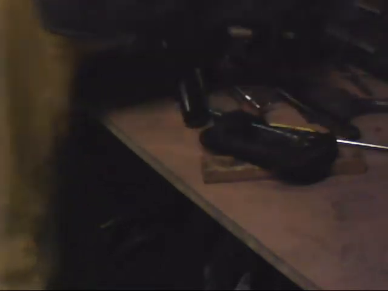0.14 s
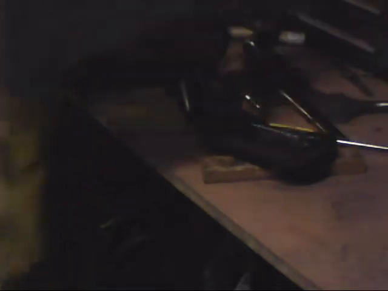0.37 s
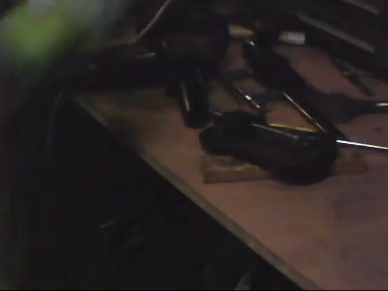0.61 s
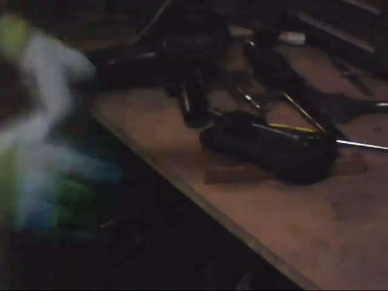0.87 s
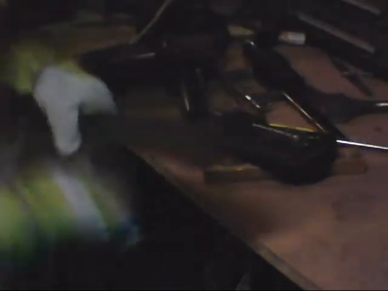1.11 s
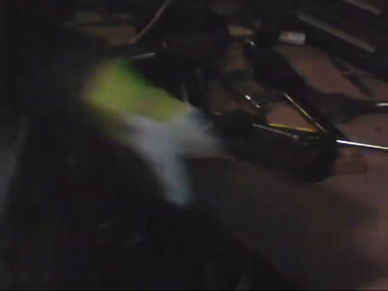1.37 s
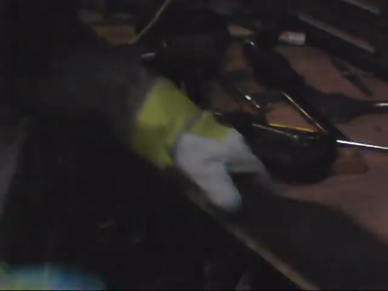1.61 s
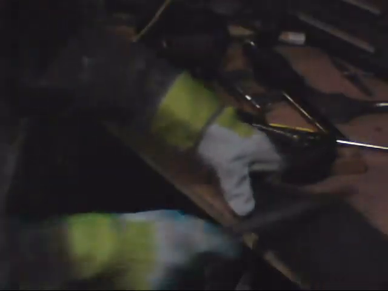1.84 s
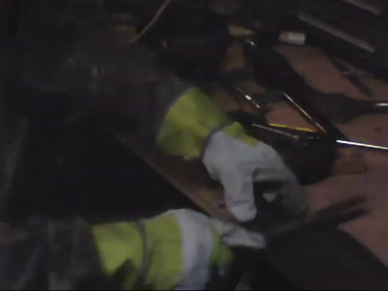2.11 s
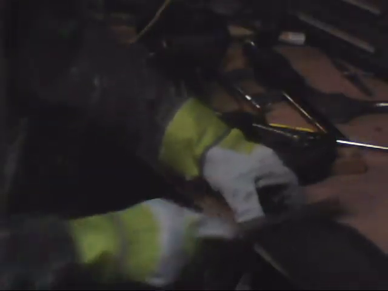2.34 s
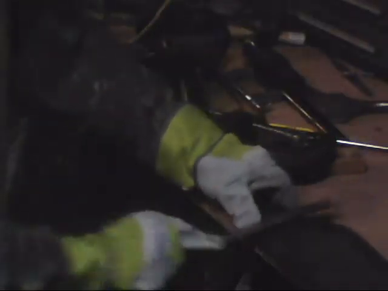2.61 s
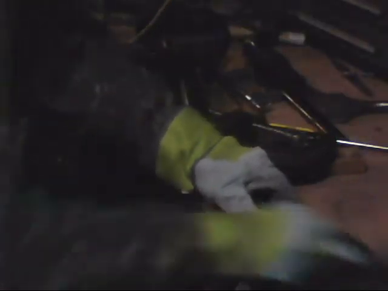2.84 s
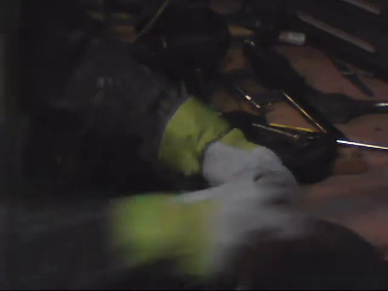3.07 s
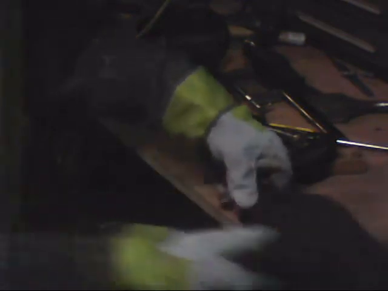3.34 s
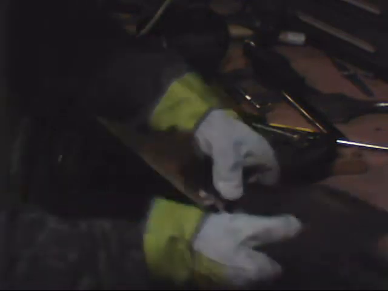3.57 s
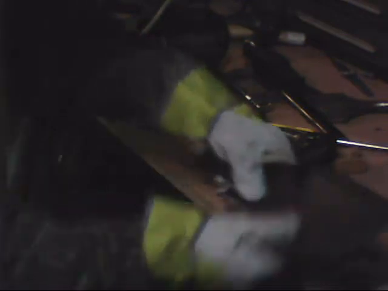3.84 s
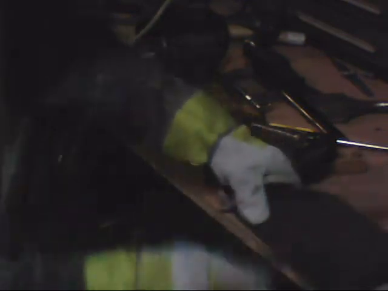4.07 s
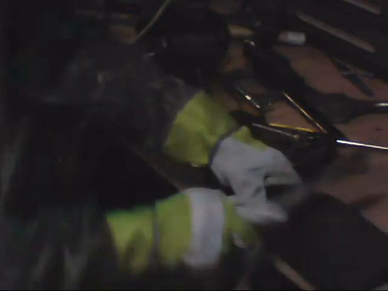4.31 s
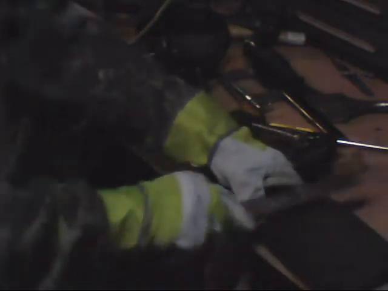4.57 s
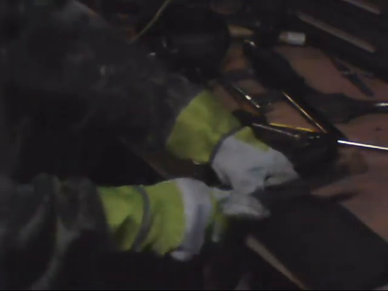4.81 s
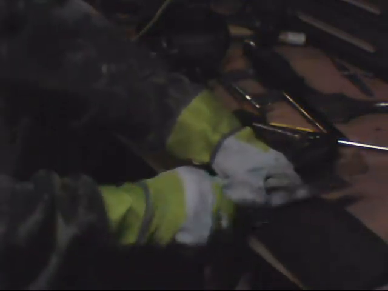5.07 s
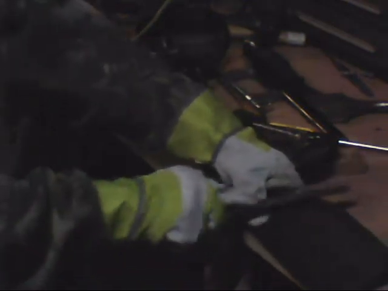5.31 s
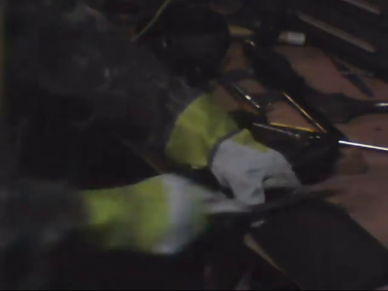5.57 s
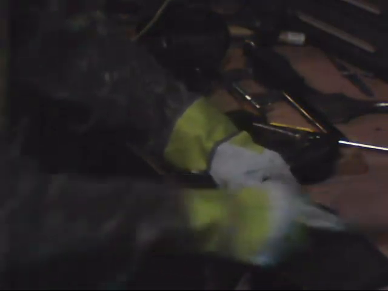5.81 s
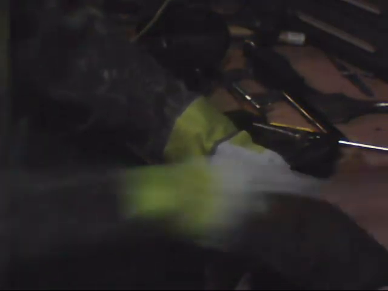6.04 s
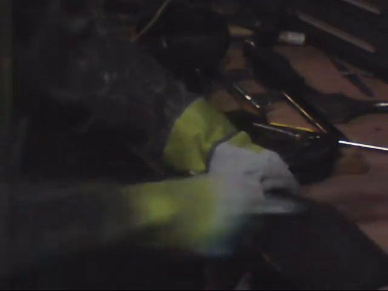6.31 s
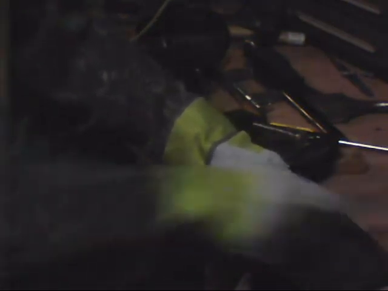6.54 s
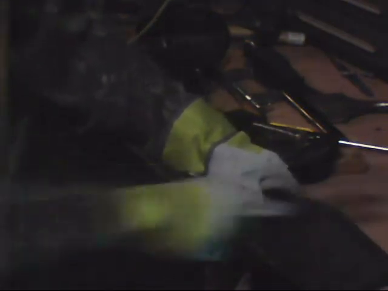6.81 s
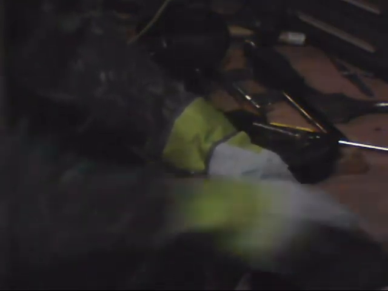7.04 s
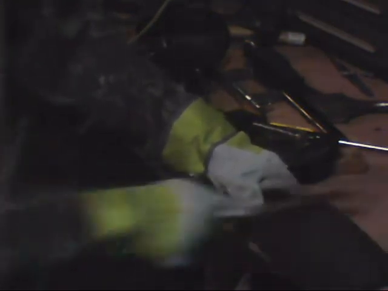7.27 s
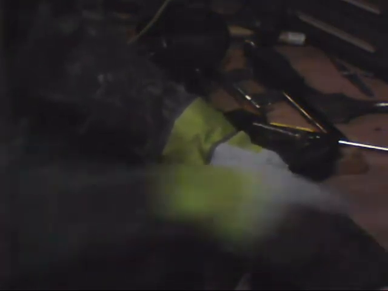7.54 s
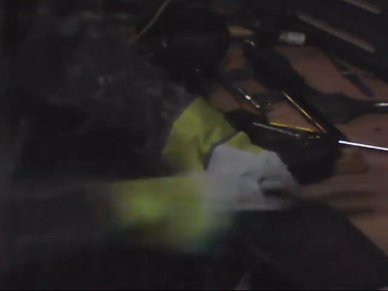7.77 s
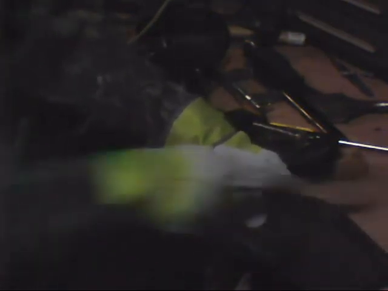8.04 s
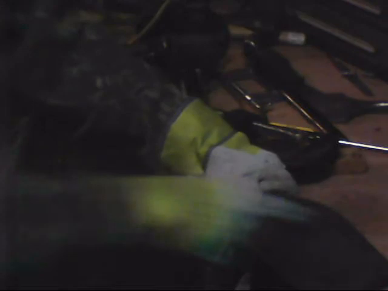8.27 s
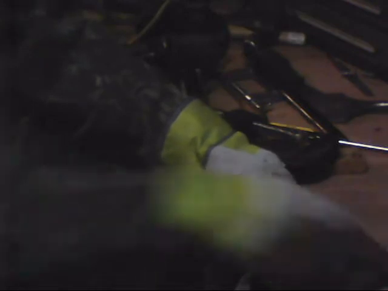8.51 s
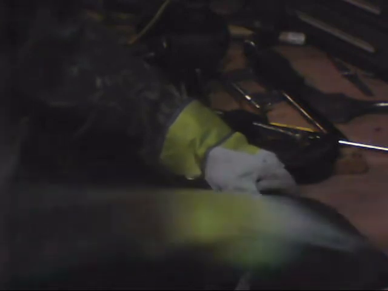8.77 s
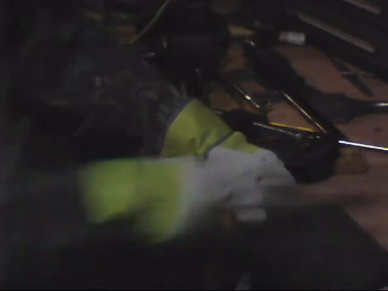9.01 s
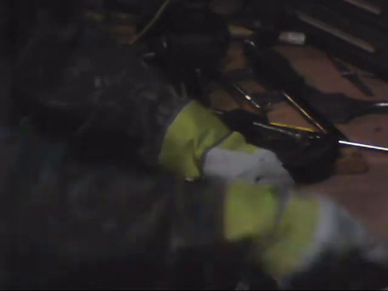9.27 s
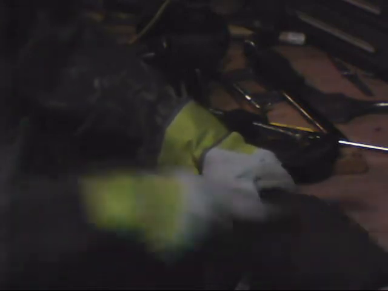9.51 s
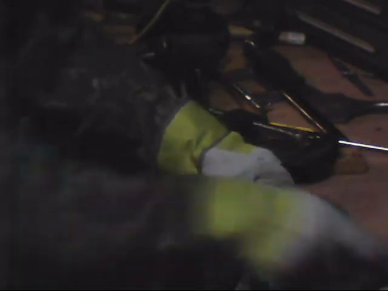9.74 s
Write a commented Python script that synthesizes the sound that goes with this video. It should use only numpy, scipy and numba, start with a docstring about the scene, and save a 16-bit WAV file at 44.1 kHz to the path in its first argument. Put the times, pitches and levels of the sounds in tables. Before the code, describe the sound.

In a small, dry workshop, about a metre from a hissy little camera microphone, loose tools clatter with bright clinks and a scrape during the first 0.4 s, including a tiny click. A small knock at 0.7 s leads into faint creaks and shuffling, then a knock at 1.6. A short file rasp comes at 1.8, light scuffs from 2.3, and a rising stroke at 2.6 to 2.9. Knocks follow at 3.0 and 3.6, then a hard, loud clack at 4.0 with a brief squeak, a knock at 4.4 and a short rasp at 4.6. Clicks at 5.1 precede a longer scrape at 5.5 to 5.9. From 6.2 to the end, gritty strokes repeat about every half second, each landing with a sharp steel knock, ringing near a nasal midrange pitch with bright edge fizz, many closing on a dull wooden tap. Hiss swells mildly around 6 to 7.

```python
"""A file rasps over a thin steel blade: many strokes land with a knock, and some end in a duller tap.
Loose tools clink while the blade is fetched. The gloved hand works at a wooden bench, a metre from a
small camera. Random catches of the teeth and chattering knocks ring resonances of blade, edge and bench.
A small workshop echoes it through delay lines; the camera microphone adds shaped noise as hiss,
very low sway, faint sine tones and a drifting offset that drops with a click."""
import sys
import numpy as np
from scipy import signal
from scipy.fft import rfft, irfft
from scipy.io import wavfile
from scipy.ndimage import uniform_filter1d
from numba import njit

SR = 44100
rng = np.random.default_rng(int(sys.argv[2]) if len(sys.argv) > 2 else 0)


def volts_from_db(level):
    """Convert decibel levels to linear amplitude ratios."""
    exponent = np.asarray(level, float) / 20
    return 10 ** exponent


def master(y):
    """Save y as 16-bit WAV."""
    cut = np.clip(np.atleast_2d(y).T, -1, 1)
    pcm = np.round(cut * 32767)  # scale
    wavfile.write(sys.argv[1], SR, pcm.astype(np.int16))


N = 435708

# File strokes, with an opening clatter and an early scrape shaped alike: (start [s],
# time to top speed [s], time from there to the end of the push [s], blade force [dB],
# edge re blade [dB], bench re blade [dB], favoured pitch at the end of the push [Hz])
STROKES = [(.2, 0.047, 0.11, -33.5, 0, -0.5, 2140), (1.814, 0.014, 0.14, -32, -5.5, -9.5, 2080),
           (2.605, .29, 0.038, -31.5, 0, -4.5, 2000), (4.583, 0.058, 0.054, -28.5, -8, -5.5, 1960),
           (5.545, .09, .3, -33, -11, 2, 1952), (6.236, 0.15, 0.14, -31, -5.5, -1, 2040),
           (6.761, 0.22, 0.039, -28, -0.5, -1, 2140), (7.259, 0.16, 0.058, -29, 0.5, -1, 2110),
           (7.72, 0.13, 0.049, -29.5, -8, -1.5, 1920), (8.19, 0.18, 0.068, -28, -2.5, -4, 1790),
           (8.688, 0.11, 0.08, -25.5, 0, -7.5, 1860), (9.112, 0.15, .025, -28, 2.5, -8, 1840),
           (9.538, 0.077, 0.1, -28, 0, -5.5, 1770)]
# The blade sings out briefly within a stroke: (peak time [s], level [dB])
SURGES = [(2.77, -41), (5.668, -32), (6.35, -30), (6.868, -21), (6.89, -23.5), (7.294, -23.5), (7.35, -22),
          (8.21, -37), (8.309, -28), (8.822, -29), (9.27, -29)]
# Scuffs and slides, each one swell: (peak time [s], rise [s], fall [s], blade force [dB],
# edge re blade [dB], bench re blade [dB])
SCUFFS = [(.18, .02, 0.041, -38.5, -2.5, 0), (.62, .04, .05, -65, -8, -5),
          (.672, 0.0086, 0.047, -45, -1, -8), (1.17, 0.086, 0.14, -58.5, -20, -9),
          (1.314, .015, 0.017, -49, -17, -22), (1.27, .02, 0.026, -65, -10, -1),
          (2.14, 0.065, 0.037, -61, -16, 0), (3.55, .02, .02, -63, -5, 11),
          (2.33, 0.074, 0.1, -35, -8, -5.5), (2.41, 0.089, 0.091, -49, -16, 11),
          (2.52, 0.047, .06, -59.5, -12, 0), (2.975, 0.0085, 0.023, -42.5, 0, 2),
          (3.17, 0.034, 0.11, -60, -9, 2.5), (3.79, 0.076, .05, -56.5, -6, -4),
          (3.931, 0.061, 0.031, -33, 0, -6), (4.09, 0.033, 0.043, -46, -12, 1.5),
          (4.15, .02, 0.025, -55, -11, -7), (4.543, 0.041, 0.029, -47, -7, 5.5),
          (4.757, 0.023, 0.036, -37, -17, -5.5), (4.824, 0.031, 0.033, -30, -13, -8),
          (4.95, 0.066, 0.11, -53.5, -11, -3), (5.159, .03, 0.08, -38.5, -15.5, -2.5),
          (5.39, 0.052, 0.096, -42, -9, 1), (5.475, 0.11, 0.048, -38.5, -10.5, 1),
          (5.9, 0.081, 0.058, -26.5, 2.5, -22), (6.549, 0.014, 0.02, -50.5, -24, 14),
          (7.94, .02, 0.028, -50.5, -16, 19.5), (8.45, 0.039, 0.021, -36, -3, 0),
          (8.63, 0.017, .03, -60.5, -9, 14)]
# The file lands: (time [s], level [dB], delay of the thud into the bench [s], thud level [dB])
LANDINGS = [(6.202, -9.5, .003, -14.5), (6.7293, -11.5, 0.0064, -16.5), (7.2265, -14, 0.0062, -15),
            (7.6975, -5.5, 0.0057, -21), (8.1575, -12.5, .015, -21.5), (8.6591, -13, 0.0059, -10),
            (9.0772, -13.5, 0.013, -9), (9.502, -16.5, 0.019, -13.5)]
# Dull taps as the file lifts or is set down: (time [s], level [dB])
TAPS = [(7.558, -18.5), (8.0075, -36.5), (8.512, -23), (8.9548, -13.5), (9.377, -15.5), (9.8168, -28.5)]
# Other knocks and clinks: (time [s], blade level [dB], edge re blade [dB], bench re blade [dB],
# nominal chatter [s]); knocks() scales these for each part
KNOCKS = [(0.1065, -36.5, -4.5, -2, 0.21), (0.167, -27, -7.5, -7, 0.046), (0.2296, -19.5, -20, -4.5, 0.1),
          (0.2915, -21, -8.5, -9, 0.039), (0.3097, -22, -11, -7, 0.045), (0.668, -30.5, 2, -22, 0.036),
          (1.5668, -18, -19, -12, 0.12), (1.8175, -25, -5, -8, 0.13), (2.1889, -46.5, -5, -0.5, 0.069),
          (3.026, -19.5, -26, -3, 0.091), (4.0304, -7.5, -32, -7.5, 0.039),
          (3.5865, -20.5, -3.5, -10, 0.074), (3.89, -34, 0, -14, 0.05), (4.3804, -18, -10.5, -10, 0.093),
          (4.599, -37, -12, -6, 0.099), (5.0666, -25, -16, -24, 0.08), (5.077, -20.5, -16.5, -10.5, 0.087),
          (7.8863, -14.5, -8.5, -4.5, 0.056), (9.248, -22, -6.5, -20, 0.04)]
# Resonances of the blade: (centre [Hz], width [Hz], relative level [dB])
BLADE_MODES = [(1453, 83, -12), (1630, 29, -6.5), (1713, 78, -11), (1892, 96, 1), (1941, 124, -2.5),
               (2044, 101, 0), (2167, 68, -8), (2228, 88, -3), (2427, 36, -20.5), (2636, 210, -17),
               (2000, 840, -9)]
# Resonances of the blade's edge: (centre [Hz], width [Hz], relative level [dB])
EDGE_MODES = [(2920, 14, 5.5), (3190, 150, -4.5), (3547, 97, 2.5), (3886, 58, -2), (4400, 65, -0.5),
              (4864, 31, -5), (5076, 94, 2.5), (5410, 123, 3.5), (5780, 79, -0.5), (6000, 76, -5.5),
              (6500, 420, -13.5), (6810, 105, -4), (8240, 74, -1.5), (8720, 59, -0.5), (10720, 230, -10),
              (11620, 150, -2.5), (13600, 140, -4), (3980, 2500, -6.5), (10640, 26500, -12.5)]
# Resonances of the wooden bench: (centre [Hz], width [Hz], relative level [dB])
BENCH_MODES = [(109, 44, -14), (234, 28, -10.5), (465.5, 58, -10), (547, 38.3, -0.5), (698, 31.3, -2.5),
               (811, 60, 1), (994.3, 23.8, 1.5), (1123, 72, -2), (1168, 58, -2), (1296, 38, -0.5),
               (844, 1210, -10)]
# Resonances of the loose tools: (centre [Hz], width before narrowing [Hz], relative level [dB])
TOOL_MODES = [(4030, 64, 3), (4750, 49, 12), (5160, 13, 15.5), (6290, 63, 4), (7040, 31, -22),
              (7730, 46, -6), (8880, 47, -9), (8650, 73, 4), (9740, 27, -25), (10740, 43, -25),
              (11500, 84, -32), (13300, 60, -6), (12500, 44, -12), (14700, 63, -14)]
# How freely the loose tools ring along: (from [s], to [s], level re edge force [dB])
JOSTLES = [(0.11, 0.417, 0), (0.664, .7, -26), (1.81, 1.992, -8.5)]
# Short creaks and squeaks, and a low rumble at the start: (start [s], length [s], centre [Hz],
# width [Hz], level before fades [dB])
CREAKS = [(.22, .16, 280, 160, -45), (0.11, .05, 4900, 19, -50), (0.64, .06, 406, 43, -54),
          (0.682, .14, 555, 13, -69), (0.702, .5, 204, 30, -70), (0.82, .19, 410, 30, -59),
          (.735, .07, 2150, 30, -64), (0.747, .09, 2300, 60, -67), (.89, .14, 2000, 19, -64),
          (1.05, .065, 1970, 18, -67), (1.018, 0.15, 410, 60, -62.5), (1.258, 0.033, 460, 50, -63),
          (3.88, .145, 554.5, 5.2, -41.5), (3.935, .1, 760, 16, -53), (3.922, 0.042, 5700, 47, -34.5),
          (5.099, 0.25, 460, 26, -54), (6.306, 0.017, 5300, 60, -40)]
# Spectrum of the microphone hiss: (frequency [Hz], relative density [dB per Hz])
HISS_SPECTRUM = [(21, -31), (35, 4), (123, -4.5), (205, -10), (294, -12), (1510, -20.5), (3530, -23),
                 (4010, -23), (6360, -24), (7420, -24.5), (8430, -24), (14800, -29), (16000, -25.5)]
# Common swell of hiss, sway and standing offset: (time [s], level [dB])
MIC_SWELL = [(.05, 5.5), (.15, 2), (1, -1), (2, 2.5), (3, 4), (4, 6), (5, 8), (6, 9.5), (7, 9.5), (8, 8),
             (9, 6), (9.88, 5.5)]
# Faint steady tones: (frequency [Hz], mean level [dB])
WHINE = [(7246, -81), (10099, -88), (11951, -89), (14804, -86)]
REST_HZ = 2000  # favoured pitch between strokes


def add_strokes(t, force, favoured_hz):
    """Force grows with speed on every part and the pitch moves along; after the push the force dies away."""
    start_speed, end_speed = 0.29, 0.62  # shares of top speed
    start_hz, fast_hz = 1827, 2084  # favoured pitch at the start and at top speed
    # for blade, edge and bench
    speed_power = np.array([[0.4], [1.62], [0.52]])
    fade_db_per_s = (700, 522, 305)
    bite_s = 0.012
    for s, push_s, ease_s, db, edge_db, bench_db, end_hz in STROKES:
        end_s = push_s + ease_s
        on = span(s, s + end_s + 0.2)
        u = t[on] - s
        turns = [0, push_s, end_s]
        speed = np.interp(u, turns, [start_speed, 1, end_speed])
        fade_db = np.outer(fade_db_per_s, np.maximum(u - end_s, 0))
        size = volts_from_db(parts_db(db, edge_db, bench_db) - fade_db)
        force[:, on] += size * speed ** speed_power * (1 - np.exp(-u / bite_s))
        favoured_hz[on] = np.interp(u, turns, [start_hz, fast_hz, end_hz])


def add_surges(t, force, favoured_hz):
    """Brief swells of blade force pull the favoured pitch towards one note."""
    rise_s, fall_s, surge_hz = 0.023, 0.052, 1872
    for s, db in SURGES:
        on = span(s - 2 * rise_s, s + 2 * fall_s)
        shape = volts_from_db(swell_db(t[on], s, rise_s, fall_s))
        force[0, on] += volts_from_db(db) * shape
        favoured_hz[on] += shape * (surge_hz - favoured_hz[on])


def add_scuffs(t, force):
    """Each scuff is one lopsided swell of force on blade, edge and bench."""
    for s, rise_s, fall_s, db, edge_db, bench_db in SCUFFS:
        on = span(s - 2 * rise_s, s + 2 * fall_s)
        swell = swell_db(t[on], s, rise_s, fall_s)
        force[:, on] += volts_from_db(parts_db(db, edge_db, bench_db) + swell)


def fidget(t):
    """Gloves shift faintly on blade, edge and bench, with one random swell common to all three."""
    spread_db = 12
    present = (t > 0.63) & (t < 7.3)
    part_db = np.array([[-69.5], [-88], [-82]])
    return present * volts_from_db(part_db + spread_db * walk(12))


def rubbing():
    """Force envelopes of everything that slides on blade, edge and bench, and the pitch the teeth favour."""
    t, favoured_hz = np.arange(N) / SR, np.full(N, float(REST_HZ))
    force = fidget(t)
    add_strokes(t, force, favoured_hz)
    add_scuffs(t, force)
    add_surges(t, force, favoured_hz)
    favoured_hz = uniform_filter1d(favoured_hz, SR // 100) * (1 + 0.051 * walk(14))
    # the file judders: the whole contact tightens and slackens, each part a little on its own
    judder_db = 2.0 * walk(45)
    own_db = np.array([1.0 * walk(160), 2.25 * walk(110), 2.3 * walk(25)])
    return force * volts_from_db(judder_db + own_db), favoured_hz


def file_teeth(favoured_hz):
    """Fine random catches on each part, with coarse ones shared; a band near the pitch drives the blade."""
    teeth = np.array([grit(16000, 2.5) for _ in range(3)])
    teeth += volts_from_db(-7) * grit(1400, 1.5)  # coarse catches shake all three parts at once
    # the teeth pass at a rate that follows the hand and drive the blade modes near it hardest
    teeth[0] += 1.04 * svf(teeth[0], 2020.0, 230.0, favoured_hz / 2000)
    return teeth


def knocks():
    """Each knock: a first hard tick, then chatter, quick on edge and blade, late and long in the bench."""
    # edge re blade dB, bench re blade dB, nominal chatter s
    landing, thud, tap = (-9, -8.5, 0.045), (-13.5, -2, 0.051), (-31, -1, 0.043)
    approach_s = 0.002225  # first touch comes just before the blow peaks
    blows = KNOCKS + [(s, db, *tap) for s, db in TAPS]
    blows += [(s, db, *landing) for s, db, _, _ in LANDINGS]
    blows += [(s + late_s, db, *thud) for s, _, late_s, db in LANDINGS]
    chatter, tick = np.zeros((3, N + SR)), np.zeros((3, N))
    t = np.arange(SR // 4) / SR
    rise_s = np.array([[0.0003], [0.0002], [0.0032]])
    rise = 1 - np.exp(-t / rise_s)
    for s, db, edge_db, bench_db, chatter_s in blows:
        # time to die away by 60 dB on each part
        fall_s = np.clip(chatter_s * np.array([[1], [0.7], [1.3]]), 0.004, 0.4)
        fall = np.exp(-np.log(1000) * t / fall_s)
        size = volts_from_db(parts_db(db, edge_db, bench_db + 3.5))
        at = int((s - approach_s) * SR)
        chatter[:, at:at + len(t)] += size * rise * fall
        tick[:, at] += size[:, 0] * volts_from_db(np.array([17, 8, 12]))
    return chatter[:, :N], tick


def ringing_board():
    """A narrow resonance of a bench board rings on after each tap."""
    tapped = np.zeros(N)
    tapped[[int(s * SR) for s, db in TAPS]] = volts_from_db(np.array(TAPS)[:, 1])
    return volts_from_db(38) * svf(tapped, 546.0, 7.6, np.ones(N))


def loose_tools(edge):
    """Force on the edge jostles the loose tools, which clink at narrow resonances."""
    t = np.arange(N) / SR
    freedom = sum(volts_from_db(db) * ((t > t0) & (t < t1)) for t0, t1, db in JOSTLES)
    narrowed = [(hz, np.clip(width * 0.43, 18, 60), db) for hz, width, db in TOOL_MODES]
    return body(edge * freedom, narrowed, np.ones(N), 8.2)


def creaks():
    """Creaks, squeaks and a low rumble: rough noise bands, narrow or wide, that swell and fade."""
    out = np.zeros(N)
    for s, length_s, hz, width, db in CREAKS:
        n, at = int(length_s * SR), int(s * SR)
        tone = svf(rng.standard_normal(SR), float(hz), float(width), np.ones(SR))
        # even out the random strength, so that each holds fairly steady
        strength = np.abs(signal.hilbert(tone)) + 1e-9
        tone = (tone / strength ** 0.7)[-n - 500:-500]
        out[at:at + n] += level(tone, db) * signal.windows.tukey(n, 0.5)
    return out


def steel():
    """Sliding and knocks shake the same blade, edge and bench; tools, creaks and board join, dry."""
    slide, favoured_hz = rubbing()
    chatter, tick = knocks()
    bounces = np.array([grit(per_s, 0.52) for per_s in (4000, 14000, 3000)])  # blade, edge, bench
    blade, edge, bench = slide * file_teeth(favoured_hz) + chatter * bounces + tick
    # the resonances follow part of the favoured pitch's movement
    bend = favoured_hz / 2000 - 1
    blade_glide = 1 + 0.4 * bend + 0.0031 * walk(18)
    edge_glide = 1 + 0.5 * bend + 0.0063 * walk(13)
    bench_glide = 1 + 0.018 * walk(9.6)
    rung = body(soften(blade, 4740), BLADE_MODES, blade_glide, 4)
    rung += body(edge, EDGE_MODES, edge_glide, 4)
    rung += body(soften(bench, 2260), BENCH_MODES, bench_glide, 2.5)
    return rung + loose_tools(edge) + creaks() + ringing_board()


def workshop(dry):
    """Small-room echo: sound circulates in eight delay lines, falling 60 dB in 0.2 s before damping."""
    lags = np.array([211, 307, 419, 547, 673, 811, 967, 1151])  # samples
    gain = volts_from_db(-60 * lags / SR / 0.2)
    return volts_from_db(-20) * walls(dry, lags, gain, 0.19)


def mic_hiss():
    """Noise shaped in frequency; its part above 1 kHz sets the level before the swell."""
    hz, db = np.transpose(HISS_SPECTRUM)
    f = np.fft.rfftfreq(N, 1 / SR)
    shape = volts_from_db(np.interp(np.log(f + 1), np.log(hz), db))
    spectrum = rfft(rng.standard_normal(N)) * shape
    treble = irfft(spectrum * (f > 1000), N)
    return irfft(spectrum, N) * volts_from_db(-65) / np.std(treble)


def mic_sway():
    """Very low rumble, noise band-passed twice near 7 Hz, that grows over the first seconds."""
    t, still = np.arange(N) / SR, np.ones(N)
    once = svf(rng.standard_normal(N), 7.0, 27.0, still)
    sway = level(svf(once, 7.0, 27.0, still), -53)
    return sway * np.interp(t, [0, 2, 6], [0.25, 0.4, 1])


def whine():
    """Faint sine tones at fixed pitches, each wavering a little in level."""
    t = np.arange(N) / SR
    return sum(np.sqrt(2) * volts_from_db(db + 2 * walk(30)) * np.sin(2 * np.pi * hz * t) for hz, db in WHINE)


def background():
    """Microphone hiss and sway swell together over a drifting offset, with a steady whine."""
    t = np.arange(N) / SR
    mic_db = np.interp(t, *np.transpose(MIC_SWELL))
    # the offset falls abruptly, with a click
    offset = -0.0125 * volts_from_db(np.where(t < 0.1155, 10, mic_db))
    return whine() + volts_from_db(mic_db) * (mic_hiss() + mic_sway()) + offset


def body(force, modes, glide, wander_db):
    """A force rings resonances; energy shifts among them as contact moves. White rms 1 gives about rms 1."""
    grip = np.array([volts_from_db(db + wander_db * min(150 / width, 1) * walk(22)) for hz, width, db in modes])
    power = sum(g ** 2 * np.pi * width / SR for g, (hz, width, db) in zip(grip, modes))
    grip /= np.sqrt(power)
    rung = 0
    for k, (hz, width, db) in enumerate(modes):
        # broader, more damped modes also wander further in pitch
        drift = glide + 0.46 * min(width, 300) / hz * walk(15)
        rung = rung + (-1) ** k * svf(force * grip[k], float(hz), float(width), drift)
    return rung


def soften(force, hz):
    """A push of finite length holds little treble."""
    return signal.sosfilt(signal.butter(3, hz, fs=SR, output="sos"), force)


def grit(per_s, spread_db):
    """Random catches of unequal size; rms 1."""
    hit = rng.random(N) < per_s / SR
    size_db = np.minimum(spread_db * rng.exponential(size=N), 18)
    return level(hit * rng.standard_normal(N) * volts_from_db(size_db), 0)


def walk(rate):
    """Random levels held 1 / rate s and slewed twice; spread below 1."""
    k = int(SR / rate)
    held = np.repeat(rng.standard_normal(N // k + 1), k)
    return 0.85 * uniform_filter1d(uniform_filter1d(held, k), k)[:N]


def swell_db(t, s, rise_s, fall_s):
    """A lopsided bell in dB: 0 at its peak, 24 down one rise before and one fall after."""
    return -24 * ((t - s) / np.where(t < s, rise_s, fall_s)) ** 2


def parts_db(db, edge_db, bench_db):
    """Levels of blade, edge and bench as a column."""
    return db + np.array([[0], [edge_db], [bench_db]])


def span(from_s, to_s):
    """The samples between two times."""
    return slice(int(from_s * SR), int(to_s * SR))


def level(x, db):
    """Scale to an rms in dB."""
    return x * volts_from_db(db) / np.sqrt(np.mean(x ** 2))


@njit
def svf(x, hz, width, glide):
    """State-variable band-pass, gain 1 at a centre that may glide."""
    y, band, low, k = np.empty(len(x)), 0., 0., width / hz
    for i in range(len(x)):
        g = np.tan(np.pi * hz * glide[i] / SR)
        v = (band + g * (x[i] + 1e-18 - low)) / (1 + g * (g + k))
        band, low, y[i] = 2 * v - band, low + 2 * g * v, k * v
    return y


@njit
def walls(x, lags, gain, damp):
    """Eight delay lines that feed each other, duller on every round."""
    line, soft, out = np.zeros((8, 4096)), np.zeros(8), np.zeros(len(x))
    for i in range(len(x)):
        total = 0.
        for k in range(8):
            soft[k] += (1 - damp) * (gain[k] * line[k, (i - lags[k]) & 4095] - soft[k])
            total += soft[k]
            out[i] += soft[k] * (1 - 2 * (k % 2))
        for k in range(8):
            line[k, i & 4095] = x[i] + soft[k] - total / 4
    return out


def scene():
    """Steel, its workshop echo and the background, on one microphone."""
    direct = steel()
    return (direct + workshop(direct) + background())[None]


def top_cut(x):
    """Nothing passes above the cut-off."""
    return signal.sosfilt(signal.butter(12, 16520, fs=SR, output="sos"), x)


def record(dry):
    """The camera cuts the top above 15.7 kHz and rounds the loudest peaks."""
    dull = signal.sosfilt(signal.ellip(8, 0.2, 30, 15700, fs=SR, output="sos"), dry)
    mix = np.tanh(1.196 * dull) / 1.259
    return top_cut(mix)


dry = scene()
out = record(dry)
master(out)
```